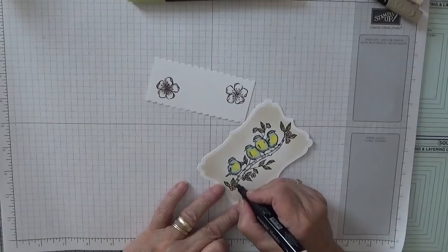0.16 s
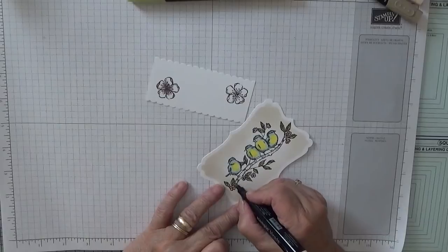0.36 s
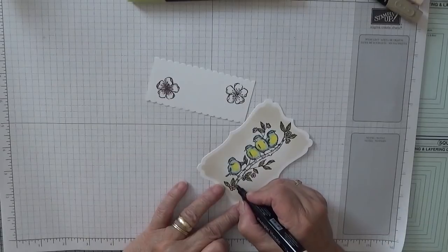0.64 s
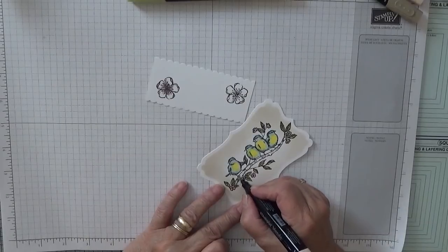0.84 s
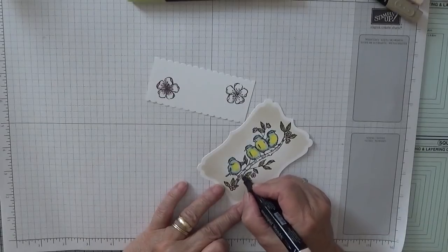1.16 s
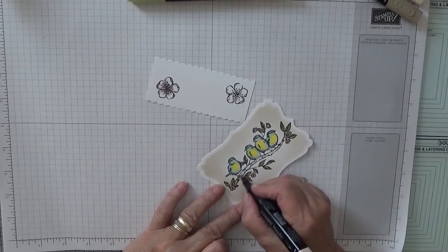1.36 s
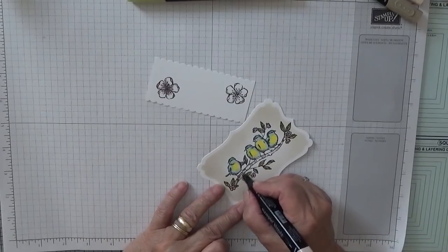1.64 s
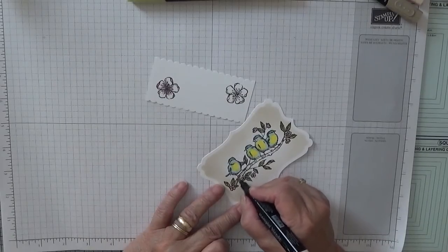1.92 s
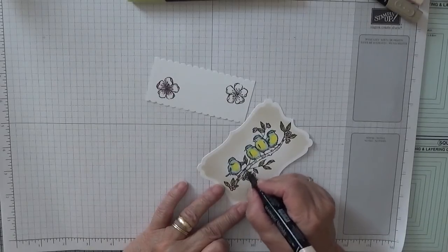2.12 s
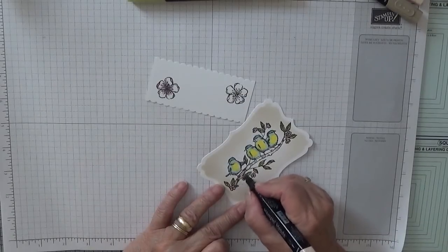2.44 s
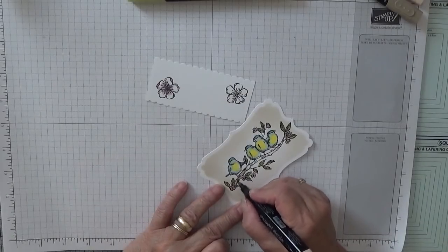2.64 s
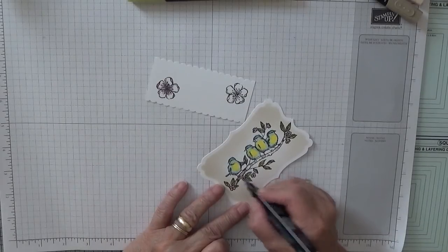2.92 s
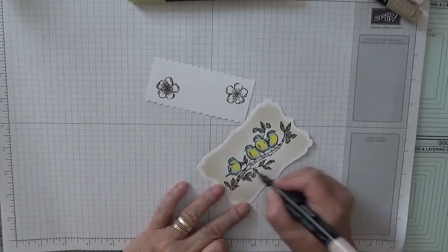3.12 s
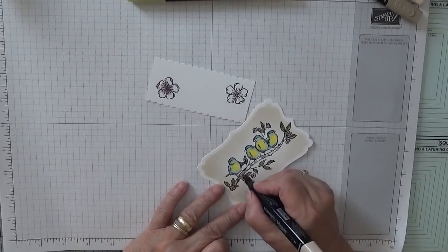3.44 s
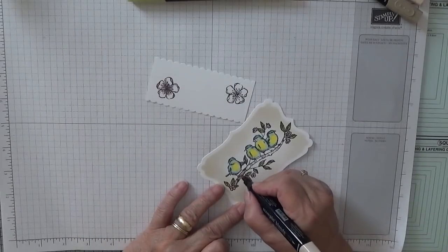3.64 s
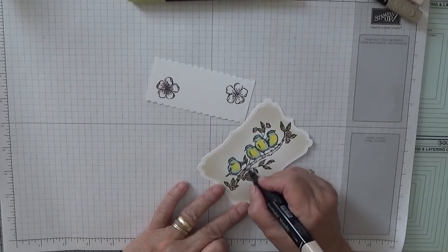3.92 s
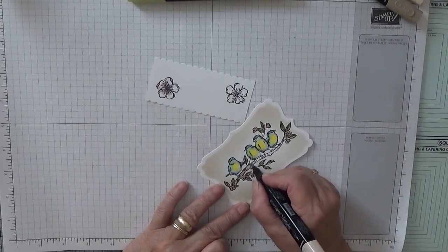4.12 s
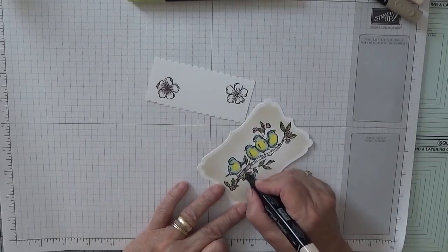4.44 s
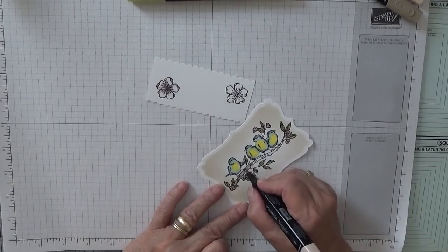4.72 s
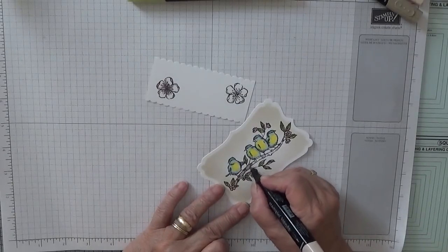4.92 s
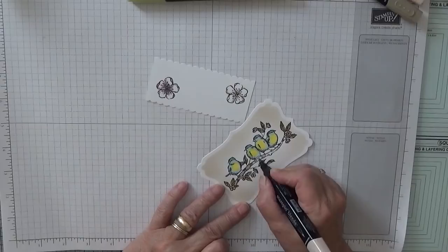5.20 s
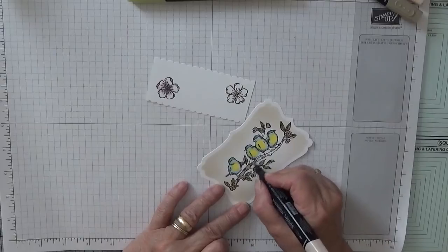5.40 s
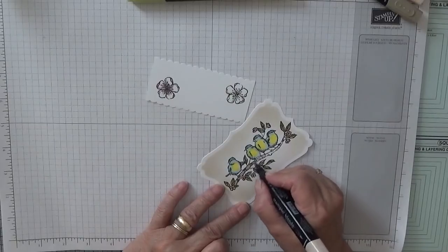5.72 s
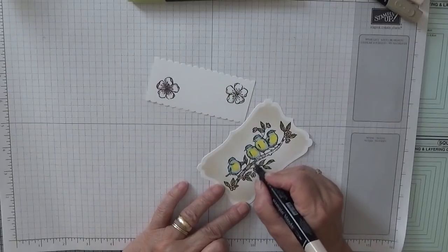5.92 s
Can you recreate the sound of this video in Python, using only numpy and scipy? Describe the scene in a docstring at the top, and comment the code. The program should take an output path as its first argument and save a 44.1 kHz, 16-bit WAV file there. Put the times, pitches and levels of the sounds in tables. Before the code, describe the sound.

In a small quiet room, a nearby microphone picks up a felt marker colouring a little card on a table. Steady soft hiss, low mains hum, a thin high whine and a faint fast electrical buzz run throughout. Two brief scratches come at 0 and 0.12 s, then a light hand brush near 0.4 s and a tiny dull bump at 0.67 s. A crackly stroke at 0.75 s leads into regular short, dry, bright rasps from 0.95 to 2.9 s, about six or seven per second, each with a small tick and a faint woody rumble. From 2.9 to 3.6 s the pen is off the card and skin slides softly over the mat. Scratching resumes at 3.7 s, slightly uneven, with a gap after 4.1 s, then steady from 4.3 s. At about 5.98 s a soft low thud rings the tabletop, with one last faint touch.

```python
"""A felt marker colours a small card in short strokes on a craft table: friction noise rings card and nib modes.
Landing ticks and snapping fibres click into the same modes; the drag rumbles through the table top.
A hand brushes and bumps softly between strokes (shaped noise); a thud rings the table at the end.
Quiet room noise, mains hum, a thin whine and a buzz of pings 25 times a second lie underneath."""
import sys
import numpy as np
from scipy import signal
from scipy.fft import rfft, irfft, next_fast_len
from scipy.io import wavfile
from scipy.ndimage import uniform_filter1d

SR = 44100
rng = np.random.default_rng(int(sys.argv[2]) if len(sys.argv) > 2 else 0)


def digitize_waveform(pressure):
    """Quantize a signal to 16-bit integers and store it at the path in sys.argv[1].

    Rows of a 2-D input are taken as channels; values are limited to [-1, 1].
    """
    field = np.atleast_2d(pressure).T
    bounded = np.clip(field, -1, 1)
    quanta = np.round(bounded * 32767).astype(np.int16)
    wavfile.write(sys.argv[1], SR, quanta)


N = 267246

# Pen strokes: touch_s, rise_before_touch_s, low_knock_db, then after touch: fastest_s, slowing_s, lifted_s;
# tick_drive_db; scratch at touch_db, fastest_db, slowing_db; low_modes_db, high_modes_db (over the shapes)
STROKES = [ (0.0038, 0.006, 0, 0.014, 0.048, 0.074, -54, -42.5, -45.5, -47.5, 1.5, -0.34),
           (0.1203, 0.0036, -2, 0.042, .09, 0.11, -26.5, -50.5, -46, -54, 3.5, -1),
           (0.754, 0.013, 3, .064, 0.11, 0.15, -33, -49, -42.5, -46.5, 1.5, -2),
           (0.9527, .004, 1, 0.032, .07, 0.093, -28, -42, -47.5, -49.5, -0.5, -1.2),
           (1.11, 0.0079, 5, 0.041, 0.072, 0.13, -30, -45, -43.5, -39.5, -2, 1),
           (1.254, .009, -1, 0.019, .044, 0.089, -30, -42, -41.5, -44.5, -3, 1),
           (1.371, .009, 0, 0.05, 0.069, 0.12, -31, -39, -36.5, -37.5, -2, 0.5),
           (1.5223, 0.0034, 0, 0.022, 0.051, 0.091, -24, -44, -44, -44.5, 1, 0),
           (1.6558, 0.011, 0, 0.055, 0.085, 0.14, -22, -43.5, -38.5, -43, 0, 0.72),
           (1.822, 0.0068, 2, .05, .113, .18, -25, -39.5, -42.5, -42.5, -0.5, 0.32),
           (2.0578, 0.012, 5, 0.048, 0.088, 0.12, -26, -42.5, -39.5, -42.5, -2, 1),
           (2.1911, 0.0056, 2, .045, 0.078, 0.15, -25, -37.5, -38, -41, -2.5, 1),
           (2.3765, 0.0088, 3, 0.044, 0.091, .13, -32, -44.5, -37.5, -38, -2, 0.54),
           (2.5292, .002, -1, 0.042, 0.087, 0.15, -19, -36, -40, -44, -0.5, -2),
           (2.713, 0.0034, 5, 0.06, 0.079, 0.1, -23, -42, -44, -46, 1, -0.69),
           (2.8723, 0.0056, 4, .008, 0.028, 0.055, -36, -46.5, -47, -55.5, 3.5, -1.8),
           (3.7055, 0.0071, 0, 0.06, 0.11, 0.18, -20, -38.5, -38, -42.5, -1.5, -0.84),
           (3.918, .001, 0, 0.051, 0.071, 0.12, -22, -41, -43, -44.5, 2, 0),
           (4.0628, 0.008, 1, 0.028, 0.066, 0.12, -28, -38.5, -41.5, -42.5, -0.5, -0.87),
           (4.3419, 0.0034, 3, 0.085, 0.11, .135, -22, -45.5, -43, -46, 0.5, -0.28),
           (4.5246, .02, 5, 0.035, 0.069, 0.12, -33, -45.5, -40.5, -43, -2.5, 0),
           (4.665, 0.011, 2, 0.04, 0.049, 0.11, -27, -38.5, -40.5, -40.5, -0.5, -1),
           (4.814, 0.013, 6, 0.031, 0.051, 0.096, -36, -42.5, -40.5, -42, -0.5, 1),
           (4.935, 0.0066, 6.5, .008, 0.046, 0.075, -38, -45.5, -43, -53.5, 6.5, -1.3),
           (5.0584, 0.0096, -5, 0.055, 0.12, .18, -38, -49.5, -41, -44, 1, 0.12),
           (5.273, .003, 7.5, 0.044, 0.07, .13, -29, -43, -41.5, -41, -0.5, -0.43),
           (5.4331, .008, -3, 0.039, 0.071, 0.12, -24, -42.5, -38, -42.5, 1, 1),
           (5.5789, 0.0064, 9, 0.061, .09, 0.14, -28, -40, -40.5, -47, 2.5, -0.39),
           (5.7398, 0.0076, 2, 0.047, 0.088, 0.13, -36, -47.5, -43.5, -46.5, 3.5, 1),
           (5.899, 0.0026, 3.5, 0.057, 0.076, 0.12, -31, -41.5, -40.5, -44, 2, -0.85),
           (6.0514, .005, 1, .004, .02, 0.056, -40, -58, -62, -58, 12.5, -0.15)]
# Band level relative to the mid modes: touch_db, fastest_db, slowing_db, lifted_db
LOW_SHAPE_DB = (-10.5, -14, -9, -0.5)
HIGH_SHAPE_DB = (-1, 2.5, -0.4, -3)
LIFT_DB, RELEASE_BEND = -68, 1.39  # mid-mode level as the nib leaves; bend over 1: the fall starts gently
KNOCK_DECAY_S = 0.01
# Card and nib resonances: pitch_hz, width_hz, relative_level_db, drift_db_per_s (as the nib works up the card)
CARD_LOW = [(1318, 430, -11, 4), (1843, 530, -14, 3.5), (2458, 650, -5, 3.5), (2800, 540, -2, 3),
            (3324, 273, 2, 2.5)]
CARD_MID = [(3910, 820, -6.5, 0.7), (4520, 614, 1, -0.55), (5420, 1140, 1.5, -0.1), (5840, 990, -1.5, -0.4),
            (6670, 1500, -1, -0.1), (7270, 410, -2.5, .1)]
CARD_HIGH = [(7760, 360, 4, 2), (8390, 630, 4, -1.4), (9210, 870, 6.5, 0.46), (10350, 690, -16, -4.4),
             (10300, 240, -41, -.1)]
# Gaps between card modes: pitch_hz, width_hz, share removed at start (0-1), share removed at end (0-1)
DEAD_SPOTS = [(4920, 145, 0.26, 0.66), (7720, 140, 0.69, 0.084), (7010, 150, .1, .7), (8730, 250, 0.1, .5),
              (3660, 170, 0.24, 0.16)]
# Lone fibres snapping: start_s, drive_db
SNAPS = [(0.757, -27), (0.777, -23), (0.815, -28), (0.836, -17.5), (1.3974, -30), (1.4274, -22),
         (3.0596, -44)]
# Table-top rumble colour: freq_hz, relative_level_db
RUMBLE_TONE = [(60, -13), (150, -11.5), (600, -2), (1000, -6), (2000, -49)]
RUMBLE_DB = -27.5  # relative to the smoothed mid-mode envelope
# Hand strokes on the mat: loudest_s, rise_s, fall_s, level_db
BRUSH = [(0.416, 0.012, 0.03, -58.5), (0.544, .02, .014, -68), (2.935, .01, .04, -69),
         (2.98, .014, 0.17, -65), (3.13, .12, 0.068, -68), (3.21, 0.083, 0.087, -58.5),
         (3.338, 0.064, .02, -68), (3.4, .08, .14, -79), (3.556, .028, .03, -70)]
# Mat friction colour: freq_hz, relative_density_db
BRUSH_TONE = [(880, -39), (1500, -6), (1830, -14), (2090, -1), (2290, -12), (2730, -4), (3450, -10),
              (4010, -3.5), (4820, -3), (5840, -3), (6400, -10), (9230, -2), (11000, -14), (14300, -45),
              (22000, -120)]
# Dull bumps of the hand: centre_s, pitch_hz, length_s, level_db
BUMPS = [(0.673, 2100, 0.01, -63.5), (0.674, 705, 0.0088, -66)]
THUD_S, THUD_PUSH_S = 5.98, 0.0047  # start, time constant of the push
# Table-top modes: pitch_hz, level_db, t60_s
TABLE = [(98, -40.5, 0.69), (147, -45.5, 0.29), (190, -48, 0.2), (270, -53, 0.19), (430, -48.5, 0.074)]
# Room noise colour: freq_hz, relative_density_db
ROOM_TONE = [(18, -30), (30, 1), (153, 0), (1520, -8.5), (2320, -9.5), (2760, -10.5), (2970, -13),
             (3200, -9), (3620, -11.5), (7980, -14), (11000, -17.5), (14300, -52), (22000, -120)]
ROOM_DB = -64  # rms of the mid channel
# Room width: freq_hz, side_minus_mid_db
ROOM_SIDE = [(60, -22), (110, -9.5), (190, -7.5), (340, -3.5), (600, -0.5), (1060, 0.5), (1880, -1),
             (3350, -4.5), (5950, -5.5), (10600, -8)]
# Mains hum partials: pitch_hz, mean_level_db_rms
HUM = [(50, -75), (100, -80.5), (150, -77), (250, -84)]
# Electronic whine: pitch_hz, level_db_rms
WHINE = [(7800, -83), (7825, -84)]
BUZZ_S = 1 / 25
# Buzz pings: centre_in_period_s, pitch_hz, length_s, level_db, alternate_swing_db (each way)
PINGS = [(.0025, 2790, .0030, -64, 0), (.0292, 2790, .0028, -67.5, 2.8), (.0360, 2790, .0025, -75, -1),
         (.0290, 3250, .0042, -66.5, 1.5)]
TOP_HZ = 11000


def undb(db):
    """dB to gain."""
    return 10 ** (np.asarray(db) / 20)


def unit(x):
    """Scale to rms 1."""
    return x / np.sqrt(np.mean(x ** 2))


def peak_filter(x, hz, width_hz):
    """One two-pole resonance, unity gain at its peak."""
    b, a = signal.iirpeak(hz, hz / max(width_hz, 20), SR)
    return signal.lfilter(b, a, x)


def ring(x, modes):
    """Sum of steep resonances (each applied twice); neighbours take turns between the rows of x."""
    out = 0
    for k, (hz, width_hz, db, *_) in enumerate(modes):
        once = peak_filter(x[k % len(x)], hz, width_hz)
        out = out + undb(db) * peak_filter(once, hz, width_hz)
    return out


def colour(x, points):
    """Shape a spectrum by (Hz, dB) points on a log-frequency axis."""
    hz, db = np.transpose(points)
    size = next_fast_len(len(x))
    freq_hz = np.maximum(np.arange(size // 2 + 1) * SR / size, 1)
    gain = undb(np.interp(np.log(freq_hz), np.log(hz), db))
    return irfft(rfft(x, size) * gain, size)[:len(x)]


def walk(rate_hz):
    """Random levels held 1 / rate_hz s and slewed twice; rms 1."""
    hold = max(int(SR / rate_hz), 1)
    steps = rng.standard_normal(int(N * rate_hz / SR * 2) + 9)
    slewed = uniform_filter1d(np.repeat(steps, hold), hold)
    return unit(uniform_filter1d(slewed, hold)[:N])


def fibres(spread_db, judder_db):
    """Friction as dense slips of uneven but bounded size; judder clumps them."""
    sizes = np.minimum(rng.exponential(size=N), 5)
    slips = rng.standard_normal(N) * undb(spread_db * sizes)
    fast_judder_db = judder_db * walk(350)
    slow_judder_db = 0.71 * judder_db * walk(60)
    return unit(slips * undb(fast_judder_db + slow_judder_db))


def room_tone():
    """Steady background noise, widest in the middle range."""
    mid, side = (colour(rng.standard_normal(N), ROOM_TONE) * undb(0.69 * walk(3.62)) for _ in range(2))
    gain = undb(ROOM_DB) / np.sqrt(np.mean(mid ** 2))
    return gain * (mid + np.outer([1, -1], colour(side, ROOM_SIDE)))


def electronics():
    """Wavering mains hum, a thin whine and short pings locked to the buzz period."""
    t = np.arange(N) / SR
    hum = sum(undb(db + 1.5 * walk(4)) * np.sin(2 * np.pi * hz * t) for hz, db in HUM)
    whine = sum(undb(db) * np.sin(2 * np.pi * hz * t) for hz, db in WHINE)
    out = np.sqrt(2) * (hum + whine)  # rms to peak
    for centre_s, hz, length_s, db, swing_db in PINGS:
        u = (t - centre_s + BUZZ_S / 2) % BUZZ_S - BUZZ_S / 2  # time from the nearest ping
        flip = np.sign(np.cos(np.pi * (t - centre_s) / BUZZ_S))  # polarity alternates
        gain = undb(db - swing_db * flip + 1.2 * walk(12))
        out = out + flip * gain * np.exp(-(u / length_s) ** 2) * np.sin(2 * np.pi * hz * u)
    return out


def strokes():
    """Fibre slips ring the card from a new spot per stroke; returns scratch and mid-mode envelope."""
    t, out, effort = np.arange(N) / SR, np.zeros(N), np.zeros(N)
    slips = fibres(spread_db=2.0, judder_db=1.2) * rng.choice([-1, 1], (2, N))
    groups = (CARD_LOW, CARD_MID, CARD_HIGH)
    spots = rng.standard_normal((40, len(groups), 8, 2))  # stroke, group, mode, (pitch, level)
    for row, spot in zip(STROKES, spots):
        touch, rise, knock_db, fast, slow, lift, _, *level_db, low_db, high_db = row
        span = slice(max(int((touch - .04) * SR), 0), int((touch + lift + .08) * SR))
        u = t[span] - touch
        phases_s = np.maximum.accumulate([0, fast, slow, lift])
        fall_s = max(phases_s[3] - phases_s[2], .005)
        release = np.clip((u - phases_s[2]) / fall_s, 0, 1) ** RELEASE_BEND

        mid_db = np.interp(u, phases_s[:3], level_db) + release * (LIFT_DB - level_db[2])
        mid_db = mid_db - 600 * np.maximum(u - phases_s[3], 0)  # dB/s: card falls silent after lift
        knock = knock_db * np.exp(-np.maximum(u + rise, 0) / KNOCK_DECAY_S)
        low_rel_db = low_db + knock + np.interp(u, phases_s, LOW_SHAPE_DB)
        high_rel_db = high_db + np.interp(u, phases_s, HIGH_SHAPE_DB)
        onset = np.clip(1 + u / max(rise, .0005), 0, 1)
        gains = [undb(mid_db + rel_db) * onset for rel_db in (low_rel_db, 0, high_rel_db)]
        effort[span] += gains[1]

        for modes, gain, shift in zip(groups, gains, spot):
            moved = [(hz * (1 + .006 * a), width_hz, db + drift * (touch - t[-1] / 2) + 1.0 * b)
                     for (hz, width_hz, db, drift), (a, b) in zip(modes, shift)]
            tone = ring(slips[:, span], moved)
            for hz, width_hz, first, last in DEAD_SPOTS:
                share = np.clip(first + (last - first) * touch / t[-1], 0, 1)
                tone = tone - share * peak_filter(tone, hz, width_hz)
            out[span] += unit(tone) * gain
    return out, effort


def snaps():
    """Landing ticks and snapping fibres: single-sample clicks into the card modes."""
    clicks = np.zeros(N)
    ticks = [(row[0], row[6]) for row in STROKES]
    for start_s, drive_db in SNAPS + ticks:
        clicks[int(start_s * SR)] = undb(drive_db)
    pair = [clicks, -clicks]
    return 2.0 * ring(pair, CARD_MID + CARD_HIGH) + 1.35 * ring(pair, CARD_LOW)


def reflections(x, t60_s, wet_db):
    """Early echoes from table and walls: decaying noise tails, one per channel, duller at the top."""
    t = np.arange(SR // 4) / SR
    tails = rng.standard_normal((2, len(t))) * np.exp(-np.log(1000) * t / t60_s)
    tails *= undb(wet_db) / np.sqrt(np.sum(tails ** 2, axis=1, keepdims=True))
    dull = colour(x, [(1000, 0), (3000, 2.0), (10000, -8.0)])
    return np.array([signal.fftconvolve(dull, tail)[:N] for tail in tails])


def rumble(effort):
    """The pen's drag shakes the table top: dull wide noise under each stroke."""
    drag = uniform_filter1d(effort, int(0.068 * SR)) * undb(RUMBLE_DB)
    return drag * np.array([unit(colour(rng.standard_normal(N), RUMBLE_TONE)) for _ in range(2)])


def brush():
    """Skin sliding on the mat: softer, finer friction in sine-squared swells."""
    t = np.arange(N) / SR
    gain = np.zeros(N)
    for loudest_s, rise_s, fall_s, db in BRUSH:
        times_s = [loudest_s - rise_s, loudest_s, loudest_s + fall_s]
        gain += undb(db) * np.sin(np.interp(t, times_s, [0, np.pi / 2, 0])) ** 2
    return gain * unit(colour(fibres(spread_db=0.5, judder_db=0.5), BRUSH_TONE))


def bumps():
    """Hand bumps: short Gaussian puffs of band noise."""
    t = np.arange(N) / SR
    out = np.zeros(N)
    for centre_s, hz, length_s, db in BUMPS:
        noise = unit(ring([rng.standard_normal(N)], [(hz, hz / 4, 0)]))
        out += undb(db) * np.exp(-((t - centre_s) / length_s) ** 2) * noise
    return out


def thud():
    """A soft push sets the table top's low modes ringing as decaying sines."""
    t = np.maximum(np.arange(N) / SR - THUD_S, 0)
    push = 1 - np.exp(-t / THUD_PUSH_S)
    modes = sum(undb(db) * np.exp(-np.log(1000) * t / t60_s) * np.sin(2 * np.pi * hz * t)
                for hz, db, t60_s in TABLE)
    return push * modes


def scene():
    """Direct sound, a little to the left in the low treble, plus echoes and background."""
    background = room_tone() + electronics()
    scratch, effort = strokes()
    near = scratch + snaps() + brush() + bumps()
    lean = colour(near, [(3000, -52), (5500, -18), (9000, -29)])
    direct = near + np.outer([1, -1], lean)
    pen = direct + reflections(near, t60_s=0.16, wet_db=-9.5) + rumble(effort)
    return pen + thud() + background


def record(dry):
    """The recorder cuts the top steeply: elliptic low-pass at TOP_HZ."""
    lowpass = signal.ellip(12, .2, 75, TOP_HZ, fs=SR, output="sos")
    return signal.sosfilt(lowpass, dry)


dry = scene()
out = record(dry)
digitize_waveform(out)
```